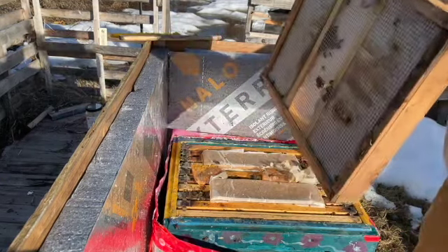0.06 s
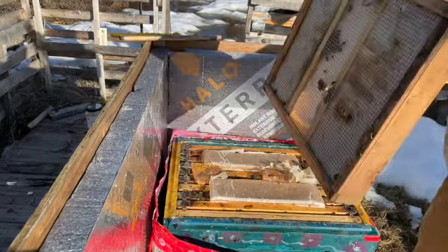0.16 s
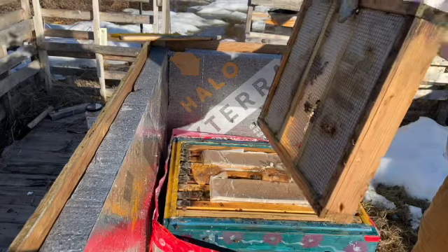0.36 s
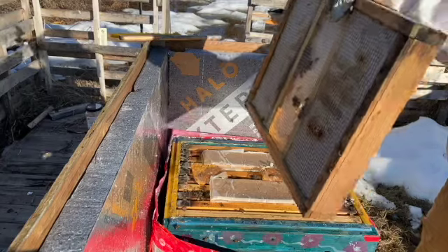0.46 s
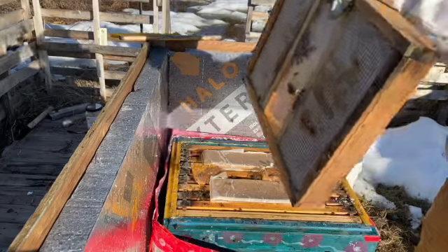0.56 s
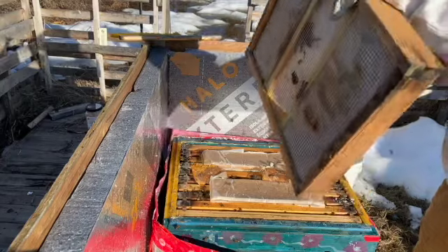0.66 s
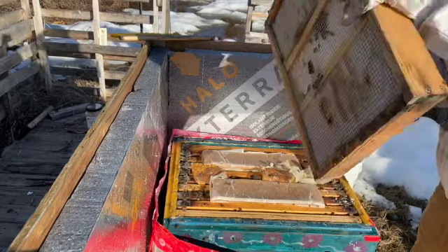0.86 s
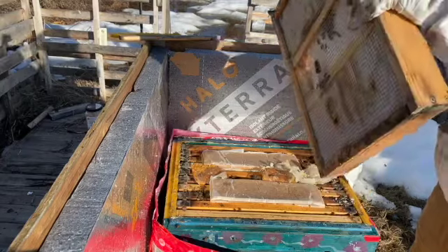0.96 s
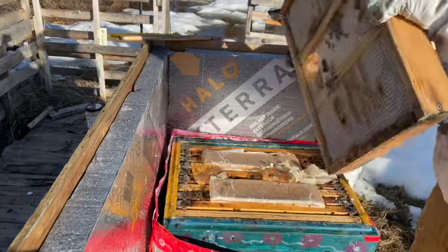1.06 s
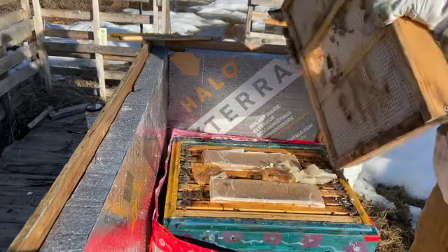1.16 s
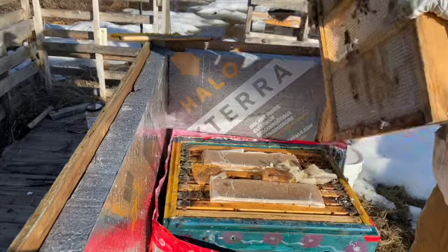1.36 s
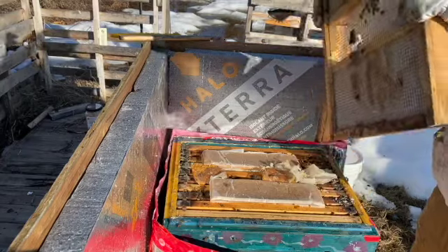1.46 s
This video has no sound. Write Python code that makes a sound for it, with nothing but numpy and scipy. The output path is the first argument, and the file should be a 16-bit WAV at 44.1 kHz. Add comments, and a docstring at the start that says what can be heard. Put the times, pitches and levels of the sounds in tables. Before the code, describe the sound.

A wooden frame knocks once, hard, on a wooden hive box outdoors, with wind buffeting the microphone

```python
"""Knock on a hive box

A wooden-framed board is knocked once against a wooden hive box, outdoors, and lifted away.
A quick clatter of contacts rings the modes of the wood and leaves a broken echo in the yard.
Shaped grains of noise make a fine patter, light ticks, scrapes and a rustle of cloth.
Puffs of air buffet the microphone as pulses that droop in pitch, over rumble and outdoor hush."""
import sys
import numpy as np
from scipy import signal
from scipy.fft import rfft, irfft
from scipy.io import wavfile

SR = 44100
rng = np.random.default_rng(int(sys.argv[2]) if len(sys.argv) > 2 else 0)


def digitize_waveform(pressure):
    """Quantize a signal to 16-bit integers and store it at the path in sys.argv[1].

    Rows of a 2-D input are taken as channels; values are limited to [-1, 1].
    """
    field = np.atleast_2d(pressure).T
    bounded = np.clip(field, -1, 1)
    quanta = np.round(bounded * 32767).astype(np.int16)
    wavfile.write(sys.argv[1], SR, quanta)


N = 66150
SIZE = 2 * N  # transform length, zero-padded
HZ = np.fft.rfftfreq(SIZE, 1 / SR)
T = np.arange(N) / SR


def amp(db):
    """Decibel law: a level in dB becomes a linear gain."""
    return 10 ** (np.asarray(db) / 20)


def unit(x):
    """Normalization: scales a signal to rms 1."""
    return x / np.sqrt(np.mean(x ** 2) + 1e-20)


def read(points):
    """Spectral interpolation: reads a (Hz, value) table along log frequency."""
    hz, value = np.transpose(points)
    return np.interp(np.log(HZ + 1), np.log(hz + 1), value)


def level(points):
    """Envelope: reads a (s, dB) table as a gain at every sample, held flat beyond its ends."""
    return amp(np.interp(T, *np.transpose(points)))


def shape(x, gain):
    """Linear filtering: multiplies the spectrum by a gain at every frequency."""
    return irfft(rfft(x, SIZE) * gain, SIZE)[..., :N]


def causal(gain):
    """Minimum phase: derives from log gain the phase that puts all ringing after the blow."""
    log_gain = np.log(np.maximum(gain, 1e-5))
    mirrored = np.r_[log_gain, log_gain[-2:0:-1]]
    return np.exp(np.conj(signal.hilbert(mirrored)))[:len(HZ)]


def click(start):
    """Ideal impulse: one sample of height 1."""
    return signal.unit_impulse(N, round(start * SR))


def burst(start, decay):
    """Exponential decay: a dying spray of random-sign impulses, of total energy 1."""
    signs = rng.choice([-1., 1.], N)
    x = signs * (T >= start) * np.exp(-abs(T - start) / decay)
    return x / np.linalg.norm(x)


def noise_pair(same):
    """Partial coherence: left and right noise sharing a fraction of their power."""
    same = np.clip(same, 0, 1)
    shared = np.sqrt(same) * rng.standard_normal(N)
    return shared + np.sqrt(1 - same) * rng.standard_normal((2, N))


def clumps(depth_db, length):
    """Random modulation: a gain of rms 1 that flickers over about the given time in seconds."""
    drift = unit(shape(rng.standard_normal(N), np.exp(-(HZ * length) ** 2)))
    return unit(amp(depth_db * drift))


def grains(rate, spread_db):
    """Random arrivals: sparse impulses of uneven size, at a mean rate per second."""
    present = rng.random(N) < rate / SR
    sizes = amp(spread_db * np.minimum(rng.exponential(1, N), 4))
    return rng.standard_normal(N) * present * sizes


BASS_LAG_KNEE_HZ = 20.5


def droop(cycles):
    """Dispersion: delays a frequency by nearly this many of its cycles, so the bass comes last."""
    return np.exp(-2j * np.pi * cycles * np.log((HZ + BASS_LAG_KNEE_HZ) / (SR / 2)))


# Phase between the two microphone ports. Each row: frequency in Hz, left lead in radians.
PORT_LEAD = [(100, 0.5), (300, -0.26), (700, 0.06), (900, 0.45), (1400, 0.9), (2000, -1.4), (2450, 1.1),
             (2800, 0.24), (3700, 1.1), (4600, -0.3), (6500, -1.2), (7500, -1.27), (9000, -4.5),
             (11200, -7), (14200, -9)]
# Level between the ports. Each row: frequency in Hz, left minus right in dB.
PORT_TILT = [(200, 1), (480, 3.5), (700, -5), (1100, -0.5), (1380, -5), (2000, -0.5), (2600, -0.5),
             (4300, 3), (7000, -5.5), (9000, -.5), (12000, 0.5)]


def ports(x):
    """Interaural-style cues: a nearby sound differs in phase and level at the two ports."""
    tilt = amp(read(PORT_TILT) / 2)
    left = tilt * np.exp(1j * read(PORT_LEAD))
    return shape(x, np.array([left, 1 / tilt]))


# Wind rumble. Each row: time in seconds, level in dB.
RUMBLE_LEVEL = [(0, -36.5), (.05, -41), (.1, -63), (.16, -47), (.26, -38), (.3, -65), (.38, -43.5),
                (.53, -37.5), (.6, -51), (.67, -42.5), (.76, -48.5), (.82, -47.5), (.87, -48), (1.0, -46),
                (1.12, -46.5), (1.19, -62.5), (1.25, -46), (1.3, -49.5), (1.36, -42.5), (1.5, -37)]
# Rumble spectrum. Each row: frequency in Hz, relative level in dB.
RUMBLE_COLOUR = [(20, -41), (40, 0), (65, 6.5), (110, -5), (180, -16.5), (300, -19), (600, -37.5),
                 (1500, -74)]
# Churning air between the puffs. Each row: time in seconds, level in dB.
CHURN_LEVEL = [(0, -51.5), (.05, -46.5), (.09, -94), (.13, -47), (.16, -52), (.28, -54.5), (.305, -48.5),
               (.34, -49), (.40, -43.5), (.42, -55.5), (.445, -49.5), (.50, -45), (.53, -58.5),
               (.56, -47.5), (.59, -65), (.66, -41.5), (.73, -56.5), (.78, -74.5)]
# Churn spectrum. Each row: frequency in Hz, relative level in dB.
CHURN_SPECTRUM = [(60, -4.5), (130, 6.5), (250, 2.5), (480, -1), (620, -22.5), (1000, -46)]
# Quiet outdoor air. Each row: frequency in Hz, relative level in dB per Hz.
AIR_COLOUR = [(30, -8.5), (150, -9.5), (450, 1.5), (700, -6.5), (1400, -9.5), (2400, -18.5), (3500, -23),
              (7000, -25.5), (8500, -30), (11000, -22.5), (13500, -35), (16000, -21.5)]
AIR_DB = -58.5
AIR_SAME, WIND_SAME = 0.42, 0.63  # power fraction alike at both ports


def breeze():
    """Turbulence noise: low wind rumble and churning air over the steady hush of the open air."""
    rumble = level(RUMBLE_LEVEL) * unit(shape(noise_pair(WIND_SAME), amp(read(RUMBLE_COLOUR))))
    churn = level(CHURN_LEVEL) * unit(shape(noise_pair(WIND_SAME), amp(read(CHURN_SPECTRUM))))
    hush = amp(AIR_DB) * unit(shape(noise_pair(AIR_SAME), amp(read(AIR_COLOUR))))
    return rumble + churn + hush


# Puffs of air on the microphone.
# Each row: start in seconds, relative level in dB, treble edge in Hz, left minus right in dB.
AIR_PUFFS = [(0.014, 5.5, 250, -2.5), (0.038, 0, 151, 3), (.132, 0, 368, 1), (0.149, -1, 197, 4.5),
             (0.241, 12.5, 85, 4), (.326, 3, 258, -4.5), (.364, -6.5, 393, 11), (.379, 8.5, 242, -5.5),
             (.428, 7, 171, -2), (.463, 6, 320, -0.5), (.474, 14.5, 125, 6), (.490, 0.5, 436, 0),
             (.502, -6.5, 488, -3.5), (0.516, 9.5, 118, 3), (.642, -5.5, 417, 5.5), (0.651, 10, 250, -4.5),
             (.672, -2, 190, 14), (0.695, -1.5, 201, 1), (.803, -2, 152, 2), (0.911, -2, 116, 1),
             (0.991, -2.5, 155, 2), (1.038, -12.5, 340, 2), (1.101, 0, 115, -2), (1.353, -5, 207, -1),
             (1.379, -8, 330, -3), (1.423, -9.5, 228, 6)]
PUFF_DB, PUFF_LOW_HZ, PUFF_LAG_CYCLES = 9.5, 69, 0.7964
PUFF_EDDY_DB, PUFF_EDDY_S = -2, 0.0075  # level beside the pulse, decay time


def puffs():
    """Dispersed pressure pulses: each sinks in pitch, trailed by eddies that differ at the ports."""
    out = np.zeros((2, N))
    for start, db, edge_hz, pan_db in AIR_PUFFS:
        eddies = np.array([burst(start, PUFF_EDDY_S) for _ in range(2)])
        pulse = click(start) + amp(PUFF_EDDY_DB) * eddies
        treble_loss = 1 + (HZ / edge_hz) ** 12
        bass_loss = 1 + (PUFF_LOW_HZ / (HZ + 1)) ** 6
        band = 1 / np.sqrt(treble_loss * bass_loss)
        gains = amp([[db + pan_db / 2], [db - pan_db / 2]])
        out += gains * shape(pulse, band * droop(PUFF_LAG_CYCLES))
    return amp(PUFF_DB) * out


# Rubbing of cloth as the board is lifted. Each row: time in seconds, level in dB.
RUB_LEVEL = [(1.027, -89), (1.034, -52.5), (1.075, -56.5), (1.125, -60), (1.155, -55), (1.185, -63),
             (1.2, -63), (1.222, -62), (1.27, -77), (1.33, -72.5), (1.375, -56.5), (1.395, -48),
             (1.412, -50.5), (1.432, -57.5), (1.465, -57), (1.485, -44.5), (1.5, -51)]
# Cloth spectrum. Each row: frequency in Hz, relative level in dB.
CLOTH_COLOUR = [(150, -12), (400, -5.5), (800, -2), (1300, -4.5), (2200, -4), (3500, -9), (5500, -11.5),
                (7500, -8), (8500, -9.5), (11000, -14), (13500, -13), (16000, -15)]
FIBRES_PER_S, FIBRE_SPREAD_DB = 9000, 0.5
RUB_CLUMP_DB, RUB_CLUMP_S = 2, 0.0015


def cloth():
    """Friction noise: thousands of fibre slips a second, in clumps, swelling with the movement."""
    slips = grains(FIBRES_PER_S, FIBRE_SPREAD_DB) * clumps(RUB_CLUMP_DB, RUB_CLUMP_S)
    return ports(level(RUB_LEVEL) * unit(shape(slips, amp(read(CLOTH_COLOUR)))))


# Rough edge of the frame scraping.
# Each row: start in seconds, length in seconds, relative level in dB, first and last pitch in Hz.
FRAME_SCRAPES = [(1.034, .06, -58, 740, 870), (1.034, 0.057, -64, 4930, 4950),
                 (1.125, 0.049, -59, 770, 870), (1.163, 0.03, -59, 1520, 2020),
                 (1.33, 0.083, -62.5, 1880, 2000), (1.389, 0.032, -47.5, 2090, 2830),
                 (1.467, 0.023, -54.5, 2830, 2750)]
SCRAPE_WIDTH = 0.19  # bandwidth as a fraction of the first pitch
SLIPS_PER_S, SLIP_SPREAD_DB = 2000, 2


def scrapes():
    """Stick-slip: slips of rough wood ring a resonance that glides as the contact point moves."""
    out = np.zeros(N)
    for start, length, db, first_hz, last_hz in FRAME_SCRAPES:
        along = np.clip((T - start) / length, 0, 1)
        pitch = first_hz + (last_hz - first_hz) * along
        turn = np.exp(2j * np.pi * np.cumsum(pitch) / SR)
        r = np.exp(-np.pi * SCRAPE_WIDTH * first_hz / SR)
        slips = grains(SLIPS_PER_S, SLIP_SPREAD_DB)
        # a resonator at zero frequency, turned up to the gliding pitch
        rung = (turn * signal.lfilter([1 - r], [1, -r], slips / turn)).real
        swell = 2 * np.sqrt(along * (1 - along))
        out += amp(db) * swell * unit(rung)
    return ports(out)


# Fine patter of what is shaken loose. Each row: time in seconds, level in dB.
PATTER_LEVEL = [(.21, -74), (.26, -71), (.34, -65), (.41, -71), (.48, -67), (.55, -82), (.6, -100)]
# Patter spectrum. Each row: frequency in Hz, relative level in dB.
PATTER_SPECTRUM = [(1500, -26), (3500, -8.5), (5200, 0), (6200, -14), (7300, 3), (11000, -1), (16000, -3.5)]
PATTER_PER_S, PATTER_SPREAD_DB = 1600, 0.5


def patter():
    """Shot noise: bees and crumbs of wax sprinkle into the box, most strongly after the knock."""
    drops = grains(PATTER_PER_S, PATTER_SPREAD_DB)
    return ports(level(PATTER_LEVEL) * unit(shape(drops, amp(read(PATTER_SPECTRUM)))))


# Light ticks of the handled frame.
# Each row: start in seconds, relative level in dB, centre in Hz, decay time in seconds.
FRAME_TICKS = [(0.3091, -30.5, 3150, 0.0011), (.366, -39, 7000, .002), (.3785, -30.5, 9280, 0.0026),
               (.430, -29, 8900, 0.0033), (.484, -37, 7110, 0.0054), (0.6708, -12.5, 990, 0.00093),
               (0.673, -35, 10000, .005), (0.7464, -11, 2180, 0.003), (0.7465, -6.5, 710, 0.0045),
               (0.866, -29.5, 2360, 0.018), (1.2118, -10, 600, 0.0032), (1.2145, -20.5, 3000, 0.0017),
               (1.212, -24, 12000, .004)]
TICK_WIDTH_OCT = 0.57  # octaves from the centre to half gain


def ticks():
    """Band-limited transients: brief scuffs of the frame, each in one broad band."""
    out = np.zeros(N)
    for start, db, hz, decay in FRAME_TICKS:
        octaves = np.log2((HZ + 1) / hz)
        band = 1 / (1 + (octaves / TICK_WIDTH_OCT) ** 2)
        out += amp(db) * shape(burst(start, decay), causal(band))
    return ports(out)


# Contacts of frame and box: landing, rebound, last rattles.
# Each row: start in seconds, relative level in dB, treble edge in Hz, crunch in dB beside the push.
FRAME_CONTACTS = [(0.2035, -11.5, 5000, 2), (0.2051, 3.5, 1500, -13), (0.2074, -1, 330, -18),
                  (0.2087, -9, 220, -14.5), (0.2144, -10, 1900, -13.5), (0.2222, -22, 1500, -2),
                  (.235, -31.5, 1200, 2.5)]
# Colour of a blow on the frame. Each row: frequency in Hz, relative level in dB.
BLOW_COLOUR = [(50, -26), (130, 0.5), (300, 5.5), (500, -5.5), (900, -8), (1500, -1.5), (2700, -5),
               (3150, -17.5), (3850, -5.5), (4600, -16.5), (6500, -14), (10500, -14.5), (16000, -27.5)]
# Modes of frame and box. Each row: frequency in Hz, relative level in dB, 60 dB decay in seconds.
WOOD_MODES = [(291, -21, 0.089), (621, -1, .05), (764, -7, .055), (887, -9.5, 0.045), (993, -9, 0.08),
              (1103, -6, 0.069), (1348, -10, .05), (1453, -0.5, 0.045), (2368, -7.5, 0.042),
              (5100, 3.5, 0.042), (6761, -3, .035)]
# Echo of the yard. Each row: frequency in Hz, relative level in dB.
YARD_COLOUR = [(100, -13), (300, -5.5), (700, -7), (1500, -13), (3000, -5), (6000, -1), (11000, -4.5),
               (16000, 9.5)]
CONTACT_DB, WOOD_DB = 19.5, -34.5
CRUNCH_S, CRUNCH_LOW_HZ = 0.0018, 2200  # decay time, bass edge
NEAR_DB, NEAR_T60, FAR_DB, FAR_T60 = -7, 0.12, -24.5, 0.54  # T60 in s
TAIL_CLUMP_DB, TAIL_CLUMP_S = 2, 0.0074


def contact_force():
    """Impact: each contact is a low-passed push with a bright crunch of rough wood."""
    bright = 1j * HZ / (CRUNCH_LOW_HZ + 1j * HZ)
    force = np.zeros(N)
    for start, db, edge_hz, crunch_db in FRAME_CONTACTS:
        push = shape(click(start), 1 / (1 + 1j * HZ / edge_hz))
        crunch = shape(burst(start, CRUNCH_S), bright)
        force += amp(db) * (push + amp(crunch_db) * crunch)
    return force


def wood_ring():
    """Modal superposition: the wood answers an impulse with a sum of decaying cosines."""
    ring = np.zeros(N)
    for hz, db, t60 in WOOD_MODES:
        ring += amp(db) * np.exp(-np.log(1000) * T / t60) * np.cos(2 * np.pi * hz * T)
    return ring


def yard_echo(direct):
    """Reverberation: convolves the knock with near and far decaying tails, broken into clumps."""
    tails = []
    for _ in range(2):
        near = amp(NEAR_DB) * burst(.004, NEAR_T60 / np.log(1000))
        far = amp(FAR_DB) * burst(0.016, FAR_T60 / np.log(1000))
        tails.append(near + far)
    broken = np.array(tails) * clumps(TAIL_CLUMP_DB, TAIL_CLUMP_S)
    return shape(direct, rfft(broken, SIZE) * causal(amp(read(YARD_COLOUR))))


def knock():
    """Source and resonator: all contacts ring the same modes and leave an echo in the yard."""
    body = causal(amp(read(BLOW_COLOUR))) * (1 + amp(WOOD_DB) * rfft(wood_ring(), SIZE))
    direct = amp(CONTACT_DB) * shape(contact_force(), body)
    return ports(direct) + yard_echo(direct)


def scene():
    """Superposition: the pressures of all sources add at the microphone."""
    return breeze() + puffs() + cloth() + scrapes() + patter() + ticks() + knock()


BASS_LAG_CYCLES, EDGE_HZ = 0.95, 16200


def record(dry):
    """Phase lag and band limit: the low cut delays the bass by nearly a cycle, then a low-pass acts."""
    lagged = shape(dry, droop(BASS_LAG_CYCLES))
    low_pass = signal.firwin(511, EDGE_HZ, window=("kaiser", 9), fs=SR)
    return signal.oaconvolve(lagged, low_pass[None], "same", axes=1)


dry = scene()
out = record(dry)
digitize_waveform(out)
```